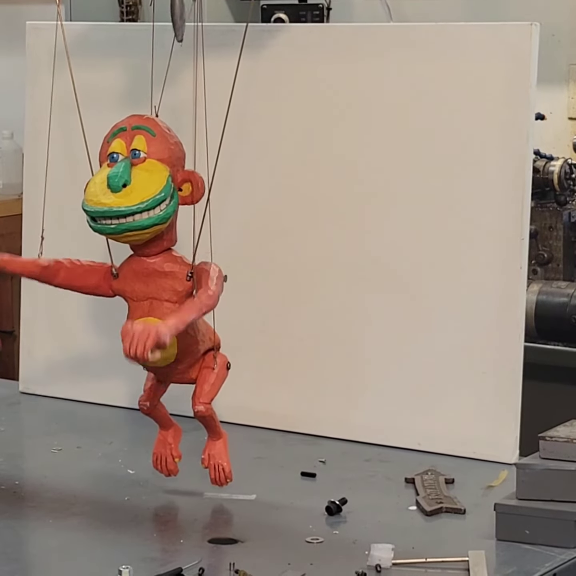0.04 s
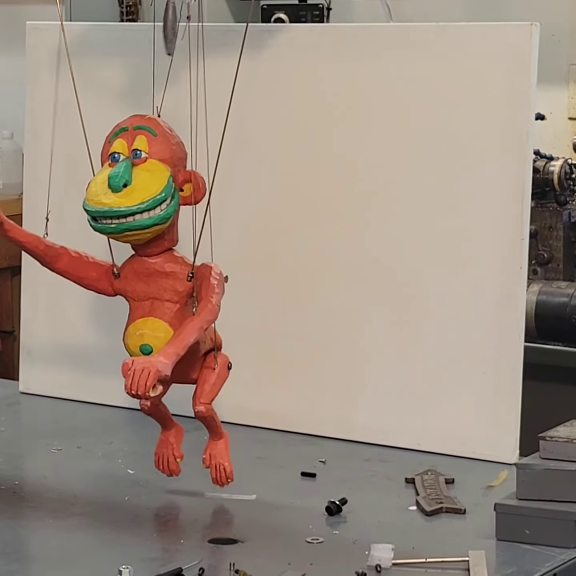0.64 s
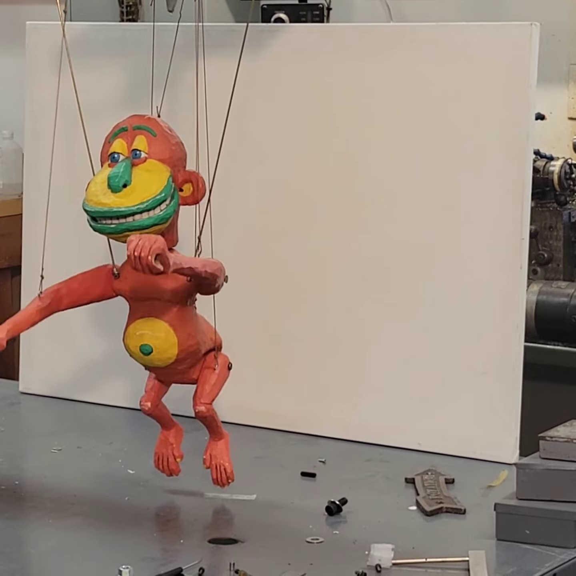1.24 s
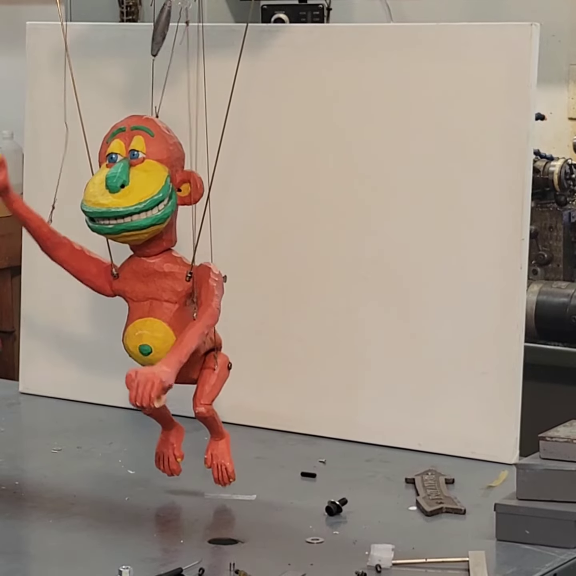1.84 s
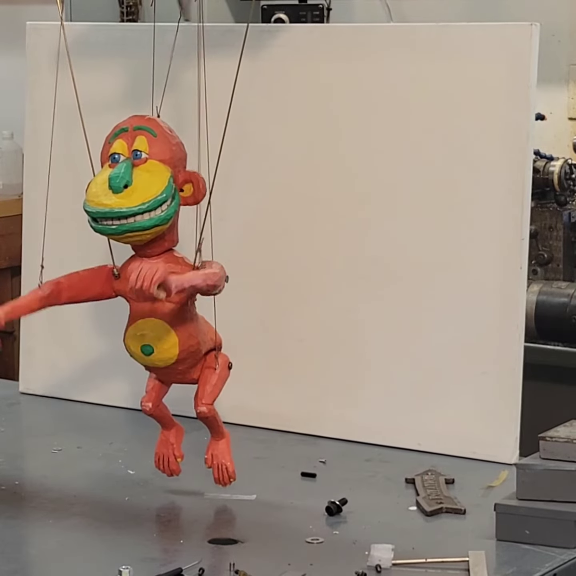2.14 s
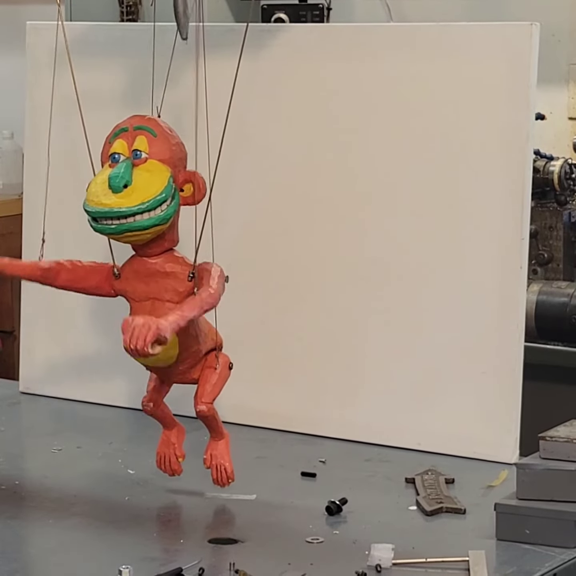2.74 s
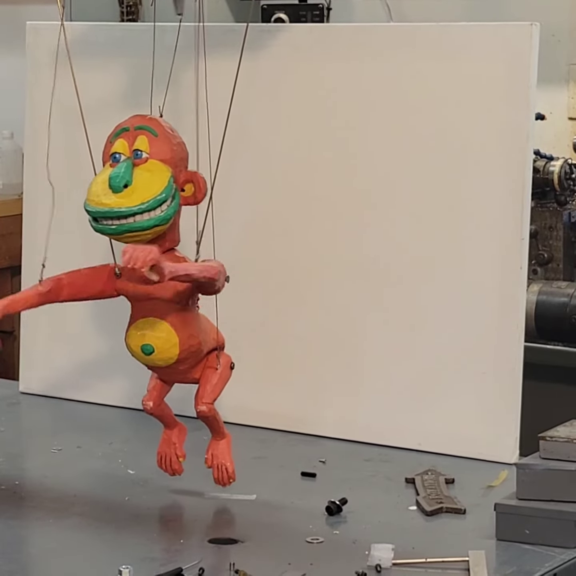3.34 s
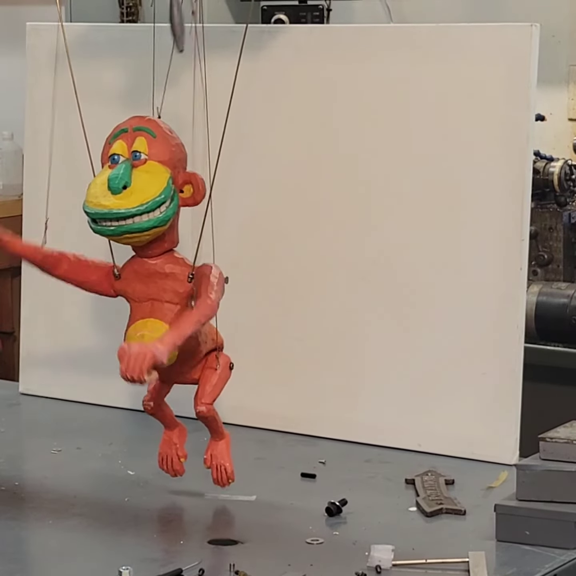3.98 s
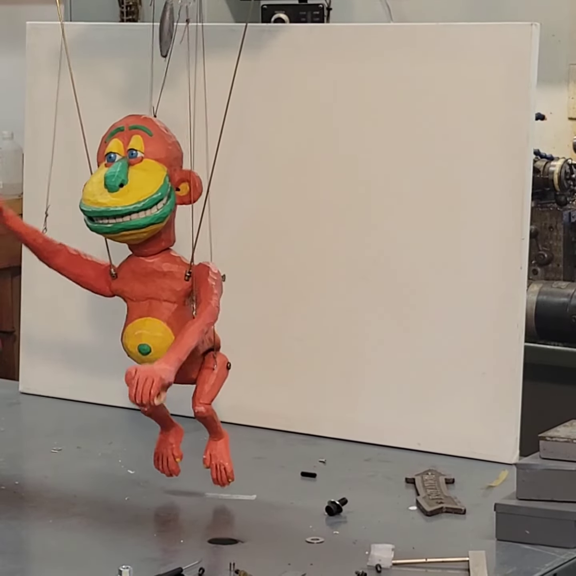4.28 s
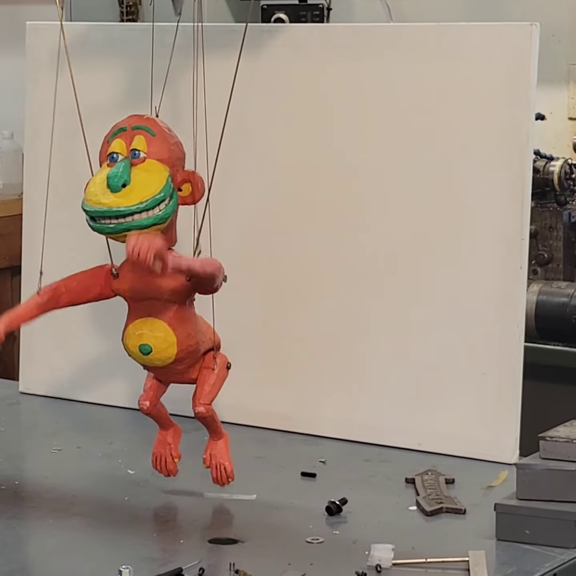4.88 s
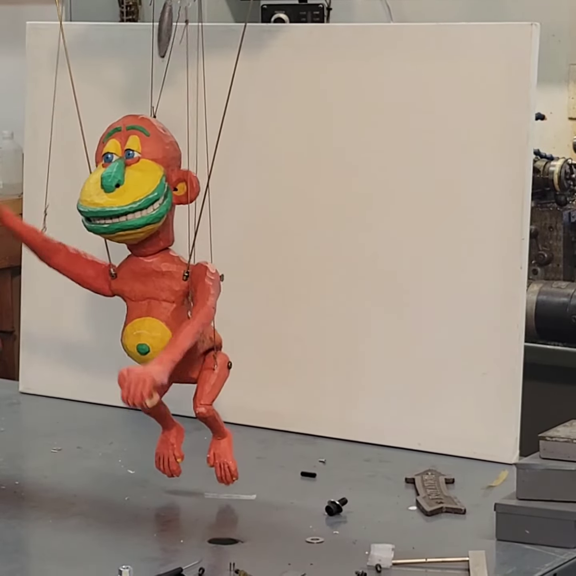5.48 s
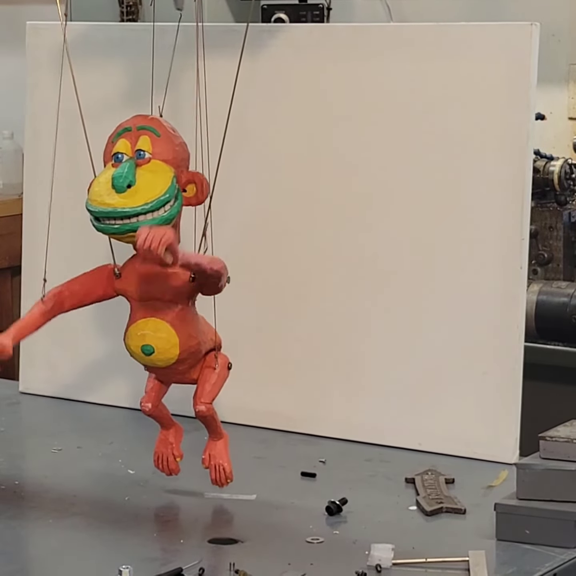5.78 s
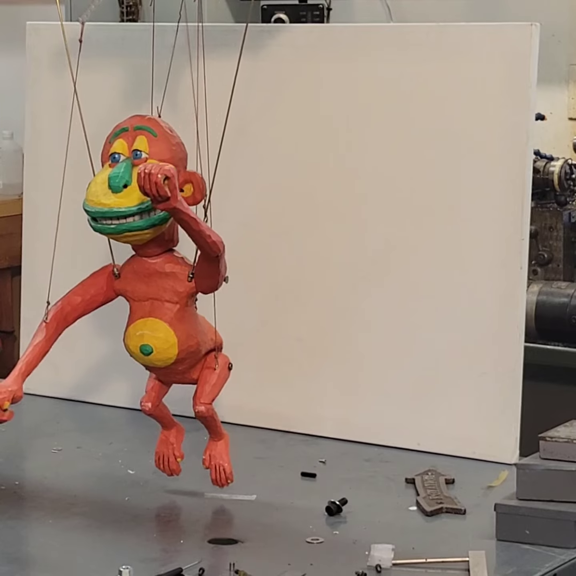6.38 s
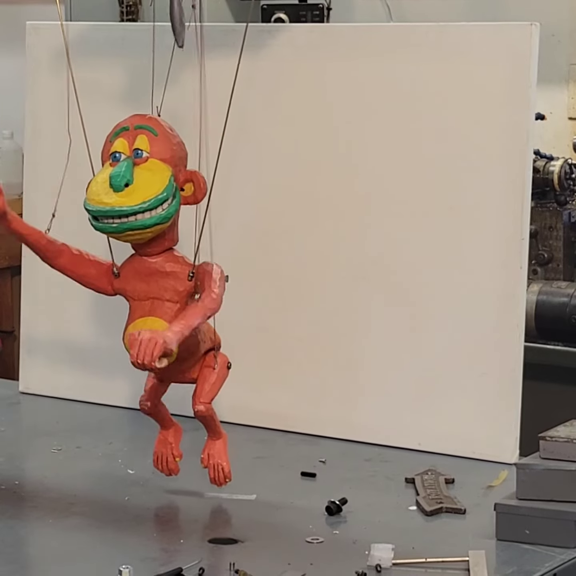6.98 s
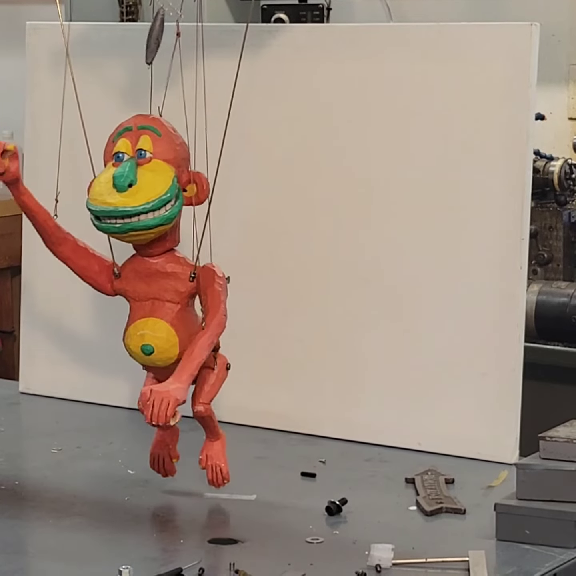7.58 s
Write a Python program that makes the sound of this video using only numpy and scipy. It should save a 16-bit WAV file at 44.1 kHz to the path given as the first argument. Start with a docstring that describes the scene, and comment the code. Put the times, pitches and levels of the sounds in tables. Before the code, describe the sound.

An air-driven rig jerks a wooden marionette in bursts of clacks, hollow knocks and hissing spits over a low workshop hum.

```python
"""An air-driven rig jerks a wooden marionette about, its levers clacking against their stops.
Wire hooks snap tight, hollow limbs knock, strings rub on their guides and a steel fitting clinks once.
Valves click and spit, escaping air hisses, and the frame shakes and rattles after each jerk.
Behind it all a motor drones, louder for a while, and mains hum and ventilation fill the machine shop."""
import sys
import numpy as np
from scipy import signal
from scipy.fft import rfft, irfft
from scipy.io import wavfile
from scipy.ndimage import uniform_filter1d

SR = 44100
rng = np.random.default_rng(int(sys.argv[2]) if len(sys.argv) > 2 else 0)


def put_to_file(sound):
    """Save the sound as 16-bit audio at rate SR, in the file named by the first command-line argument."""
    columns = np.atleast_2d(sound).T  # one column per channel
    safe = np.clip(columns, -1, 1)
    whole_steps = np.round(safe * 32767)
    wavfile.write(sys.argv[1], SR, whole_steps.astype(np.int16))


N = 340452
TIME = np.arange(N) / SR

# Levers hitting their stops. Each row: start in seconds, level in dB, the lever's own pitch in Hz,
# then the boosts in dB for that pitch, the low body, the treble and the chatter.
CLACKS = [(0.0014, -34.5, 2370, 3.5, 4.5, 1, -7.5), (0.1835, -36.5, 2350, 4, 3.5, -7, 20),
          (0.2183, -30, 3240, 5, 3, 4, -20), (0.2897, -39.5, 1900, 1, 7, -11, -11),
          (0.3637, -39, 1900, 3, -1.5, -23, -8), (0.4776, -43, 2280, -3, 6, -1, -11),
          (1.4558, -31, 3500, 8, -1, -7, 5), (1.4786, -31.5, 2520, 6, -1.5, 2, -1),
          (1.5805, -33, 3180, 5, 1, 4, -14), (1.5927, -30.5, 3130, 4, 4, 5.5, 12),
          (1.6773, -31, 3650, 7, -6, -4, -3), (1.7858, -30.5, 3220, 2.5, 2, 4.5, -7.5),
          (1.803, -33.5, 3000, 2, -1.5, 3, -12), (2.135, -37, 2460, 8, -7, 0, 4),
          (2.1514, -36.5, 2560, 0.5, 2.5, -4, -4), (2.6712, -34.5, 4300, 8.5, 2, 2.5, -13),
          (2.735, -35.5, 1950, -6, 0.5, 0, -9), (2.7636, -33.5, 2500, 3, -4, -4, -11),
          (2.7866, -32, 2500, 2, 1, 1, -8), (2.8337, -33, 2500, -1, 2.5, 0, 10),
          (2.8982, -30, 3180, 6, -2.5, -1, -27), (2.917, -33, 2290, 6, 7, -1, -14.5),
          (3.3872, -30, 2500, 2.5, -7.5, -3, -4), (3.4244, -35.5, 2400, 1, 2, -2, 0),
          (3.657, -36, 1940, 5, 8, 1, 3), (3.6785, -28, 3170, 10, 1, 4.5, -10.5),
          (3.6999, -27.5, 3130, 1, -0.5, 1.5, -11), (3.7806, -38, 2440, -3, 5, -1, -22),
          (3.93, -36.5, 3700, 10, -15, -4, -20), (3.9423, -29, 2980, 1.5, -1, -4, -19),
          (4.0161, -35, 3400, 6, 9, 6, -16), (4.0757, -27.5, 3030, -1, -8, -8, -13),
          (4.0963, -30, 2650, -2, 4.5, 6, -15), (4.3715, -40, 3050, 6.5, 7.5, 3, -12.5),
          (4.6645, -50, 1850, 9, -3, -1, -9), (4.9379, -38.5, 2080, 11, 0, -3, -11),
          (4.9632, -25.5, 3760, 7.5, -4, -4, -2), (5.1526, -30.5, 3200, 3, 1.5, 1, -11),
          (5.222, -33.5, 2430, 11, 3, -2, -13.5), (5.2497, -27, 3160, 2, 3, -1.5, -15),
          (5.388, -34, 2380, 6, -2, -8, -14), (6.731, -33, 2360, 2.5, -2, -3, 21),
          (6.793, -25, 1720, 0, 2, 2.5, -23), (6.8132, -26, 3130, 9, 10.5, 2, -18),
          (6.8828, -34, 3080, 4, -3, -4, -3), (6.9255, -26, 2400, 1, -5, 1, -5),
          (6.9519, -29, 3500, 5.5, 1.5, 1, -1), (6.9842, -31.5, 2400, 4, 6, 0, -1),
          (7.0812, -26.5, 3130, 10.5, 2, 4, -10), (7.1206, -29, 3160, 2, 5, 4.5, -7.5),
          (7.17, -34.5, 1970, 6, 5, -2, 5), (7.2086, -31, 3650, 4.5, -2, 5, -10),
          (7.5268, -41.5, 2200, 10, 10.5, 3, -21)]
# Hooks snapping as a string pulls tight. Each row: start in seconds, level in dB, pitch in Hz.
HOOK_SNAPS = [(1.456, -36, 5000), (1.5938, -32, 5000), (1.787, -33, 5200), (2.1525, -32, 4680),
              (2.7357, -35, 4500), (2.7871, -28, 5160), (2.8995, -33, 5000), (3.695, -26, 4680),
              (3.7813, -33, 4840), (3.8741, -52, 5030), (3.929, -28, 4200), (4.0168, -37, 4320),
              (4.371, -44, 4850), (5.252, -44, 4570), (6.761, -31, 4220), (6.8144, -19.5, 4470),
              (6.8828, -31, 4010), (6.9834, -25, 4400), (7.083, -26, 4550), (7.1238, -29, 4860),
              (7.207, -33, 4400), (7.528, -58, 4800)]
# Limbs knocking. Each row: start in seconds, level in dB, boost of the higher tones in dB.
KNOCKS = [(0.002, -46, -8), (0.1805, -39, 3), (0.2885, -36, 4), (0.3635, -36.5, 6.5), (0.475, -44, -0.5),
          (0.691, -49.5, -9), (1.539, -32, 2), (1.614, -39, -4), (1.68, -40.5, -16), (1.738, -38.5, 0),
          (2.087, -46.5, -6), (2.29, -50, -7), (2.553, -52, -16), (2.606, -53.5, -14), (2.682, -32.5, 3),
          (2.944, -43, 9), (2.991, -48, -2), (3.037, -43.5, 0), (3.138, -49.5, -5), (3.188, -47, -6),
          (3.247, -47, -2), (3.318, -45.5, -1), (3.413, -40, -3), (3.556, -43.5, -13), (3.669, -38.5, -1.5),
          (3.734, -40, -12), (3.926, -38.5, -2.5), (4.008, -40.5, 2), (4.156, -36, 1.5), (5.034, -37.5, -3),
          (5.126, -41.5, -11), (5.192, -43, 5), (5.248, -40.5, -16), (5.315, -44.5, 1), (5.391, -45, -13),
          (6.796, -29, -2), (6.844, -36.5, 3), (6.917, -39, -19), (6.962, -31.5, -10), (6.976, -39, -3),
          (7.112, -29.5, 6.5), (7.194, -42.5, -13)]
# Valves spitting. Each row: start in seconds, level in dB, share through the high port from 0 to 1.
PUFFS = [(0.2204, -41.5, 0.7), (0.414, -45.5, 0.4), (0.5844, -52, 0.4), (0.6963, -53, 0.65),
         (1.371, -37.5, 0.33), (1.622, -37.5, 0.7), (1.687, -33.5, 0.5), (2.132, -39, 0.4),
         (2.511, -47, 0.67), (2.631, -34.5, 0.4), (2.653, -33, 0.24), (2.7651, -48, 0.5),
         (2.8894, -55, 0.5), (3.346, -36.5, 0.24), (3.6894, -40, 0.5), (3.7844, -39, 0.35),
         (3.873, -38.5, 0.75), (3.9983, -37.5, 0.23), (4.846, -36, 0.7), (4.9656, -34, 0.67),
         (5.1083, -42, 0.3), (5.363, -44, 0.8), (5.917, -56, 1), (6.0995, -50.5, 0.83), (6.196, -48, 0.73),
         (6.2716, -52, 0.8), (6.777, -34, 0.4), (6.814, -43, 0.9), (6.924, -37, 0.1), (7.0823, -38, 0.4),
         (7.458, -48, 0.5)]
# Air flowing while a cylinder moves. Each row: start, time to full flow and end in seconds,
# then the levels in dB at the low-pitched and the high-pitched port (air outlet).
STROKES = [(-0.05, 0.035, 0.06, -66, -64), (0.157, 0.023, 0.25, -66, -70), (0.9, 0.12, 1.33, -66.5, -67),
           (1.48, 0.047, 1.57, -57, -61.5), (1.9, 0.058, 2.09, -64, -66), (2.22, 0.021, 2.35, -66.5, -65.5),
           (2.77, 0.094, 2.92, -58.5, -62.5), (3.15, 0.052, 3.3, -62, -62), (3.35, 0.018, 3.58, -61, -63.5),
           (3.69, 0.28, 4.05, -65.5, -64), (4.33, 0.035, 4.67, -60.5, -64.5),
           (4.855, 0.025, 4.92, -57.5, -63), (4.97, 0.14, 5.36, -61, -63.5), (5.47, 0.12, 6.22, -60.5, -65),
           (6.635, 0.012, 6.71, -59, -64), (6.76, 0.0078, 7.24, -58, -60)]
# Valve clicks, the steel clink and backboard booms. Each row: start in seconds, level in dB.
VALVE_TICKS = [(0.2244, -38), (1.485, -37), (1.6237, -30), (1.6911, -31), (2.6329, -36), (2.766, -37),
               (2.83, -52), (3.3867, -43), (4.9656, -46), (5.1083, -43), (5.364, -43), (5.917, -38),
               (6.756, -47), (6.815, -45), (6.926, -31), (6.933, -39), (7.0818, -48), (7.105, -44)]
CLINKS = [(4.1676, -29.5)]
BOOMS = [(0.21, -43.5), (0.287, -48), (0.419, -46), (1.66, -41.5), (2.758, -46), (3.722, -49), (4, -42.5),
         (5.199, -47.5), (6.821, -38.5), (6.96, -43.5), (7.127, -42.5)]
# Strings dragging. Each row: start in seconds, length in seconds, pitch in Hz, level in dB.
RUBS = [(0.538, 0.089, 2420, -60.5), (0.714, 0.078, 2400, -57.5), (0.959, 0.037, 2850, -60),
        (1.058, 0.25, 2320, -70.5), (1.392, 0.027, 2060, -49), (2.023, 0.047, 2480, -55.5),
        (2.521, 0.061, 2320, -67), (3.182, 0.088, 3050, -64.5), (3.349, 0.045, 2370, -56.5),
        (3.872, 0.029, 1960, -52.5), (4.392, 0.038, 1900, -62), (4.878, 0.056, 1940, -58.5),
        (5.741, 0.066, 2390, -64.5), (6.58, 0.091, 2580, -63), (6.711, 0.036, 2380, -58),
        (7.316, 0.067, 2950, -55.5)]
# Jerks that shake the frame. Each row: start in seconds, length in seconds, level in dB.
JERKS = [(-0.1, 0.7, -45.5), (0.84, 0.065, -51), (1.537, 0.42, -42), (2.233, 0.087, -42),
         (2.663, 0.7, -44.5), (3.438, 0.9, -43.5), (5, 0.56, -44.5), (6.8, 0.23, -38.5),
         (7.142, 0.16, -36.5), (7.465, 0.05, -44)]
# The tones each part rings with. Each row: pitch in Hz, level in dB, seconds to fade by 60 dB.
LINKAGE_TONES = [(1436, 4.5, 0.13), (1800, -0.5, .2), (1955, -13.5, 0.27), (2285, -6, 0.19),
                 (2400, 1.5, 0.096), (2574, -3, 0.19), (2700, -5.5, 0.2), (3070, 1.5, 0.12)]
LOW_WOOD_TONES = [(260.5, -11.5, 0.1), (441.4, -2.5, 0.085), (466.7, 2, 0.14), (497.7, 1, 0.075),
                  (550.5, -6, 0.12), (649.3, -5, 0.14), (738, -8, 0.07)]
HIGH_WOOD_TONES = [(809, -13.5, 0.14), (951, 2, 0.098), (1024, -2, 0.05), (1150, -6.5, 0.076),
                   (1196, -19, 0.044), (1453, -3, 0.083)]
STEEL_TONES = [(3830, -3, 0.043), (4840, -3, 0.05), (7150, -7, 0.094), (7750, -11, .05), (9100, -16, .04),
               (10040, -10, .035), (11970, -2, .025), (12900, -8, .025), (14000, -9, .025),
               (15550, -11, .025)]
BOARD_TONES = [(131.1, 14, 0.42), (85, -22, .1)]
FRAME_TONES = [(27.6, -1.5, 0.32), (40.7, -6, 0.45), (81, -13, 0.085)]
# The colour of each noise, from bass to treble. Each row: frequency in Hz, level in dB.
CLACK_COLOUR = [(150, -16.5), (500, -3.5), (900, -10.5), (1250, -11.5), (1500, 1.5), (2000, -2.5),
                (2400, -0.5), (2900, -2), (3500, -4.5), (4200, -5), (5200, -7), (6400, -18.5),
                (9000, -25.5), (15000, -26)]
CHATTER_COLOUR = [(1200, -1), (2500, 1.5), (3600, -1), (5000, -2), (9000, -3)]
LOW_PORT_COLOUR = [(500, -21), (1500, -15), (3050, -8), (4400, -8), (5100, -0.5), (5700, -1), (6600, 1.5),
                   (7350, 5), (7950, -0.5), (10100, -2.5), (10900, -12), (15000, -37)]
HIGH_PORT_COLOUR = [(2000, -11), (6000, -11), (8000, -10), (10000, -4), (10900, -9.5), (11900, 3),
                    (12800, 2.5), (13700, -0.5), (14700, -6), (15600, -9.5)]
VENT_COLOUR = [(20, 9), (50, -31), (90, 9.5), (150, 5.5), (200, -2.5), (320, 3), (400, -11.5), (490, 0.5),
               (600, -17.5), (720, -7.5), (1000, -12), (2500, -15.5), (5000, -22), (10000, -21),
               (12700, -20), (16000, -22)]
# Lasting tones of the motor, and of the mains and machines. Each row: pitch in Hz, level in dB.
MOTOR_TONES = [(240, -6), (255, -4.5)]
HUM_TONES = [(120, -56.5), (226, -74), (360, -82), (528, -81), (721, -81), (6029, -92)]
# How long the shop echoes. Each row: frequency in Hz, seconds to fade by 60 dB.
ROOM_FADE = [(100, 1), (500, 0.84), (2500, 0.64), (6000, 0.52), (15000, 0.38)]
# How alike left and right sound in the shop. Each row: frequency in Hz, likeness from 0 to 1.
ROOM_LIKENESS = [(100, 0.36), (300, 0.74), (600, 0.34), (1200, 0.071), (4000, 0)]


def levers():
    """A lever hits its stop, bounces a little and makes loose joints chatter. The linkage rings along."""
    places, t = np.zeros((2, N)), TIME[:SR // 4]  # two spots on the rig, each with its own echoes
    hz = np.geomspace(150, 16000, 160)
    ring_octaves = 0.14  # half the width of a lever's own ring
    for k, (start, db, ring_hz, ring_db, body_db, treble_db, chatter_db) in enumerate(CLACKS):
        bounce_s = rng.uniform(0.004, 0.013)
        bounce = 0.17 * (t > bounce_s) * fade(np.abs(t - bounce_s), 0.036)
        contacts = noise(len(t)) * (fade(t, 0.015) + bounce)
        grains = noise(len(t)) * undb(rng.exponential(size=len(t))) * (rng.random(len(t)) < 0.03)
        chatter = unit(colour(grains, CHATTER_COLOUR)) * undb(chatter_db - 8) * fade(t, 0.24)
        force = (contacts + chatter) * rise(t, 0.002)
        own_ring = ring_db * np.exp(-(np.log2(hz / ring_hz) / ring_octaves) ** 2)
        tilt = along([(1750, body_db - 0.7), (2300, 0.041), (3700, 0.8), (4600, treble_db)], hz)
        hit = colour(force, np.transpose([hz, along(CLACK_COLOUR, hz) + own_ring + tilt]))
        add(places[k % 2], start, at_level(hit, db))
    out = np.zeros((2, N))
    for hits in places:
        linkage = unit(signal.oaconvolve(hits, ring(LINKAGE_TONES, t))[:N])
        out += room(hits + undb(-13) * np.std(hits) * linkage, near_db=1.5, tail_db=0.67, left_db=0.1)
    return out


def hooks():
    """A wire hook snaps against its eye: one hard, bright contact a few milliseconds long."""
    out, t = np.zeros(N), TIME[:SR // 20]
    for start, db, hz in HOOK_SNAPS:
        contact = noise(len(t)) * fade(t, 0.013) * rise(t, 0.00051)
        snap = colour(contact, [(hz / 4, -16), (hz * 0.7, -8), (hz * 0.9, 0),
                                (hz * 1.12, 0), (hz * 1.45, -13), (hz * 2.2, -26)])
        add(out, start, at_level(snap, db - 5.5))
    return room(out, near_db=4, tail_db=-2, left_db=5)


def limbs(shake):
    """Hollow wood knocks with a dull click. While the frame shakes, the loose joints keep tapping."""
    out, t = np.zeros(N), TIME[:SR // 4]
    for start, db, upper_db in KNOCKS:
        contact = noise(len(t)) * fade(t, 0.022)
        click = colour(contact, [(150, -15.5), (360, -12.5), (470, 4.5), (640, 5),
                                 (1100, -6.5), (1400, -7), (1800, -9.5), (6000, -22.5)])
        wood = struck(LOW_WOOD_TONES, t) + undb(upper_db) * struck(HIGH_WOOD_TONES, t)
        knock = (wood + undb(6) * click) * rise(t, 0.0014)
        add(out, start, at_level(knock, db + 2.5))
    taps = crackle(N, per_second=30) * shake
    tap_ring = ring(LOW_WOOD_TONES, t) + undb(-13) * ring(HIGH_WOOD_TONES, t)
    out += undb(-19.5) * signal.oaconvolve(taps, tap_ring)[:N]
    return room(out, near_db=-3, tail_db=-2.5, left_db=-1.2)


def struck(tones, t, detune=0.0051, spread_db=3):
    """Each blow lands on another spot, so the tones vary a little in pitch and level."""
    chance = rng.standard_normal((len(tones), 2))
    varied = [(hz * (1 + detune * a), db + spread_db * b, fade_s)
              for (hz, db, fade_s), (a, b) in zip(tones, chance)]
    return ring(varied, t)


def exhaust():
    """Air leaves by two ports: a spit when a valve switches, and a hiss while a cylinder moves."""
    *_, low_dbs, high_dbs = np.transpose(STROKES)
    low_power = airflow(low_dbs, swell_db=4.5, sag_db_per_s=34.6)
    high_power = airflow(high_dbs, swell_db=0.57, sag_db_per_s=19)
    t = TIME[:SR // 2]
    for start, db, high_share in PUFFS:
        spit_power = (undb(db - 10.5) * fade(t, 0.19) * rise(t, 0.0053)) ** 2
        add(low_power, start, spit_power * (1 - high_share))
        add(high_power, start, spit_power * high_share)
    spatter = 1 + undb(16) * (rng.random(N) < 70 / SR)  # about 70 tiny ticks a second
    low_jet = jet(spatter * np.sqrt(low_power), LOW_PORT_COLOUR)
    high_jet = jet(spatter * np.sqrt(high_power), HIGH_PORT_COLOUR)
    return (room(low_jet, near_db=10, tail_db=8.5, left_db=5.5)
            + room(high_jet, near_db=4, tail_db=-1, left_db=-8.5))


def airflow(full_dbs, swell_db, sag_db_per_s, valve_s=0.033):
    """Air power at one port: a valve opens, the flow swells, sags with the pressure and is shut off."""
    power = np.zeros(N)
    for (start, swell_s, end, *_), db in zip(STROKES, full_dbs):
        t = TIME[max(int((start - valve_s) * SR), 0):int((end + valve_s) * SR)]
        full_at = start + swell_s
        shape_db = np.interp(t, [start, full_at, full_at + 1], [-swell_db, 0, -sag_db_per_s])
        opening = gate(t, start - valve_s / 2, end + valve_s / 2, valve_s)
        add(power, t[0], opening * undb(db + shape_db) ** 2)
    return power


def jet(strength, port_colour, wander=0.013):
    """Swirling air sputters through a port, and the pitch of its hiss wanders a little."""
    sputter = strength * undb(2 * drift(45) + 2.23 * drift(500))
    blend = np.pi / 4 * (1 + np.tanh(drift(7)))
    lower, higher = (colour(sputter * noise(N), [(hz * shift, db) for hz, db in port_colour])
                     for shift in (1 - wander, 1 + wander))
    return np.cos(blend) * lower + np.sin(blend) * higher


def valve_ticks():
    """A valve snapping over gives a crisp, very short click."""
    out, t = np.zeros(N), TIME[:SR // 20]
    for start, db in VALVE_TICKS:
        contact = noise(len(t)) * fade(t, 0.016)
        click = colour(contact, [(2000, -25), (6000, -9), (8500, -7),
                                 (11000, -4), (12700, 8), (15500, -1)])
        add(out, start, at_level(click, db - 2.5))
    return room(out, near_db=1, tail_db=-3, left_db=-4)


def clink():
    """A small steel fitting is struck: a sharp, bright tick with a short ring."""
    out, t = np.zeros(N), TIME[:SR // 4]
    for start, db in CLINKS:
        contact = noise(len(t)) * fade(t, 0.028)
        tick = colour(contact, [(1500, -2.5), (10000, -8), (12400, 1), (16000, -1)])
        add(out, start, at_level(ring(STEEL_TONES, t) + undb(12.5) * tick, db + 5))
    return room(out, near_db=8.5, tail_db=9.5, left_db=1)


def strings():
    """A dragged string sticks and slips, and each tiny slip makes its guide ring."""
    out = np.zeros(N)
    for start, length, hz, db in RUBS:
        count = int(length * SR)
        slips = crackle(count, per_second=900)
        rub = colour(slips, [(hz / 3, -20), (hz * 0.7, -9), (hz * 0.9, 0),
                             (hz * 1.1, 0), (hz * 1.35, -9), (hz * 3, -22)])
        swell = np.sin(np.linspace(0, np.pi, count))
        add(out, start, unit(rub * swell) * undb(db - 5.5))
    return room(out, near_db=2.5, tail_db=4.5, left_db=0.5)


def shaking(rise_s=0.1, fade_s=0.73, rest_db=-67):
    """How hard the frame moves: it builds up in each jerk, then dies away to a slight tremble."""
    shake = np.full(N, undb(rest_db))
    for start, length, db in JERKS:
        build_up = np.clip((TIME - start) / rise_s, 0, 1)
        die_away = fade(np.maximum(TIME - start - length, 0), fade_s)
        shake = np.maximum(shake, undb(db) * build_up * die_away)
    return shake


def frame(shake):
    """The frame sways and twists with a deep rumble, and hard jerks make the backboard boom."""
    frame_ring = ring(FRAME_TONES, TIME[:SR])
    motions = (signal.fftconvolve(noise(N + SR), frame_ring)[SR:N + SR] for _ in range(2))
    sway, twist = (m / np.sqrt(uniform_filter1d(m ** 2, size=4000)) for m in motions)  # even in level
    rumble = undb(-8) * sway + undb(-23) * np.array([twist, -twist])
    booms, t = np.zeros(N), TIME[:SR // 2]
    for start, db in BOOMS:
        boom = ring(BOARD_TONES, t) * rise(t, 0.0063) ** 2
        add(booms, start, at_level(boom, db + 4))
    return (shake * rumble + booms) * pan(-1.1)


def motor(idle_db=-71, load_boost_db=9):
    """Two close tones throb against each other, louder while the motor is under load."""
    drone = sum(undb(db + 4.5 * drift(7.7)) * np.sin(2 * np.pi * hz * TIME + 0.5 * drift(6.3))
                for hz, db in MOTOR_TONES)
    load = gate(TIME, start=2.5, end=4.76, ramp_s=0.32)
    return drone * undb(idle_db + load * load_boost_db) * pan(-0.5)


def hum_and_ventilation():
    """Slightly wavering mains hum lies over the rush of the ventilation."""
    hum = sum(undb(db + 1.5 * drift(11)) * np.sin(2 * np.pi * hz * TIME + 0.033 * drift(19))
              for hz, db in HUM_TONES)
    air = spread(colour(noise(N), VENT_COLOUR), colour(noise(N), VENT_COLOUR))
    return np.sqrt(2) * hum * pan(-3) + air * undb(-59 + 1.2 * drift(1.99)) * pan(-0.19)


def room(x, near_db, tail_db, left_db):
    """Add quick echoes from the bench and backboard, and the long, fading echo of the shop."""
    t = TIME[:32768]
    bands = np.geomspace(60, 16000, 9)
    hz = np.arange(len(t) // 2 + 1) * SR / len(t)
    spectrum = rfft(noise((2, len(t))))
    tail = np.zeros((2, len(t)))
    for band_hz, only_this_band in zip(bands, np.eye(len(bands))):
        weight = np.interp(np.log(hz + 1), np.log(bands), only_this_band)
        tail += irfft(spectrum * weight) * fade(t, along(ROOM_FADE, band_hz))
    tail *= np.clip(t / 0.0074 - 0.3, 0, 1)  # the long echo arrives a moment late
    near = crackle((2, len(t)), per_second=4410) * fade(t, 0.031) * (t > 0.0006)
    response = sum(undb(db) * spread(*(part / np.linalg.norm(part, axis=1, keepdims=True)))
                   for part, db in ((near, near_db), (tail, tail_db)))
    echoes = signal.oaconvolve(x[None], response, axes=1)[:, :N]
    return (x + echoes) * pan(left_db) / np.hypot(1, undb(near_db))


def spread(a, b):
    """Turn two noises into left and right: partly alike in the bass, unrelated in the treble."""
    hz = np.arange(len(a) // 2 + 1) * SR / len(a)
    likeness = np.clip(along(ROOM_LIKENESS, hz), 0, 1)
    mid = irfft(rfft(a) * np.sqrt((1 + likeness) / 2), len(a))
    side = irfft(rfft(b) * np.sqrt((1 - likeness) / 2), len(a))
    return np.array([mid + side, mid - side])


def colour(x, points):
    """Shape a sound's bass and treble along a curve of (Hz, dB) points."""
    cepstrum = irfft(along(points, np.arange(1025) * SR / 2048) * np.log(10) / 20)
    # Folding the second half onto the first makes the filter ring after a hit, never before it.
    cepstrum[1:1024] *= 2
    cepstrum[1025:] = 0
    response = irfft(np.exp(rfft(cepstrum)))
    return signal.oaconvolve(x, response / np.linalg.norm(response))[:len(x)]


def along(points, hz):
    """Read between (Hz, value) points, with octaves evenly spaced."""
    point_hz, values = np.transpose(points)
    return np.interp(np.log(hz + 1e-3), np.log(point_hz), values)


def ring(tones, t):
    """The fading tones of a struck object. Neighbours start in opposite directions."""
    return sum((-1) ** k * undb(db) * fade(t, fade_s) * np.sin(2 * np.pi * hz * t)
               for k, (hz, db, fade_s) in enumerate(tones))


def noise(size):
    """Plain, even hiss."""
    return rng.standard_normal(size)


def crackle(size, per_second):
    """Tiny clicks of random strength at random moments."""
    return noise(size) * (rng.random(size) < per_second / SR)


def drift(per_second):
    """A smooth random wobble, about 1 in size."""
    hold = int(SR / per_second)
    steps = np.repeat(noise(N // hold + 1), hold)
    return 1.3 * uniform_filter1d(uniform_filter1d(steps, hold), hold)[:N]


def rise(t, rise_s):
    """Climb from 0 towards 1, about two thirds of the way after rise_s."""
    return 1 - np.exp(-t / rise_s)


def fade(t, fade_s):
    """Die away, 60 dB down after fade_s."""
    return np.exp(-np.log(1000) * t / max(fade_s, 0.002))


def gate(t, start, end, ramp_s):
    """Rise at start, hold, and fall back to nothing at end."""
    return np.clip(np.minimum(t - start, end - t) / ramp_s, 0, 1)


def undb(db):
    """Turn decibels into a volume factor."""
    return 10 ** (np.asarray(db) / 20)


def unit(x):
    """Scale to an average power of 1."""
    return x / np.sqrt(np.mean(x ** 2))


def at_level(x, db):
    """Scale a burst so that its loudest 6 ms lie 9 dB under db."""
    return x * undb(db - 9) / np.sqrt(uniform_filter1d(x ** 2, size=256).max())


def pan(left_db):
    """Volume factors that put the left side left_db above the right."""
    return undb(np.array([[left_db], [-left_db]]) / 2)


def add(track, start, x):
    """Mix a sound into a track, with start in seconds."""
    i = max(int(start * SR), 0)
    track[i:i + len(x)] += x[:N - i]


def scene():
    """The whole rig at work in the shop."""
    shake = shaking()
    rig = levers() + hooks() + limbs(shake) + strings() + exhaust() + valve_ticks() + clink()
    return rig + frame(shake) + motor() + hum_and_ventilation()


def record(dry, top_hz=15750):
    """Cut away the highest treble."""
    return signal.sosfilt(signal.ellip(10, 0.2, 70, top_hz, fs=SR, output="sos"), dry)


dry = scene()
out = record(dry)
put_to_file(out)
```